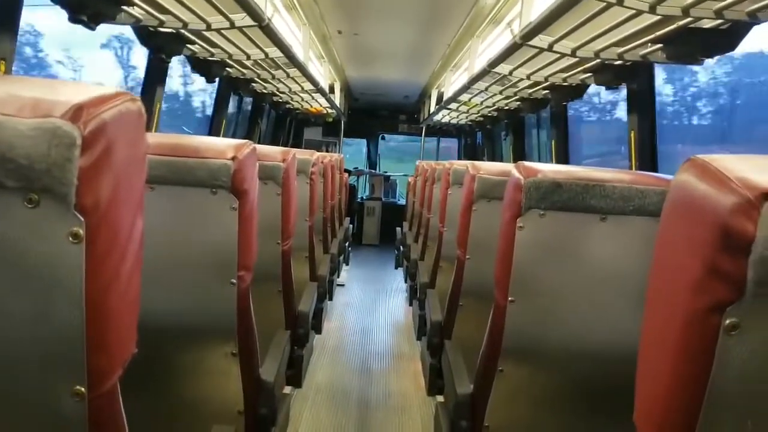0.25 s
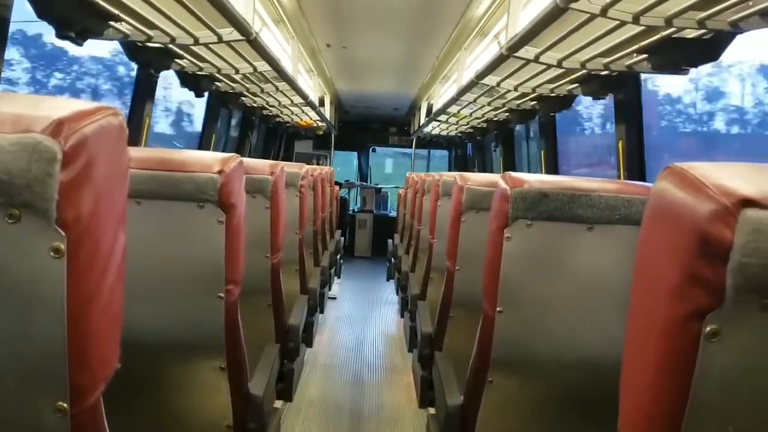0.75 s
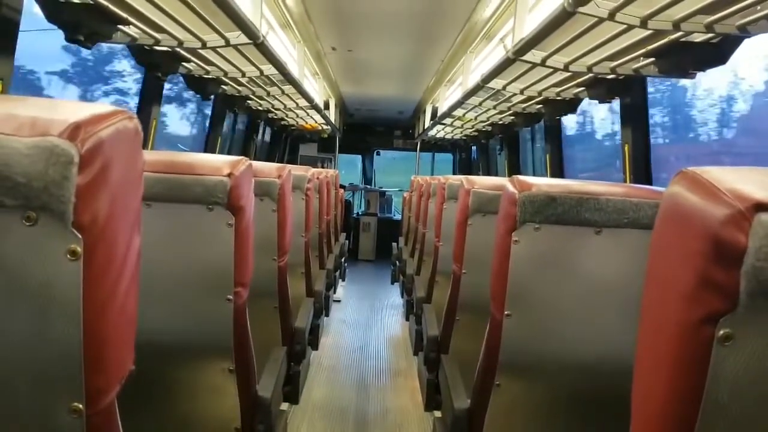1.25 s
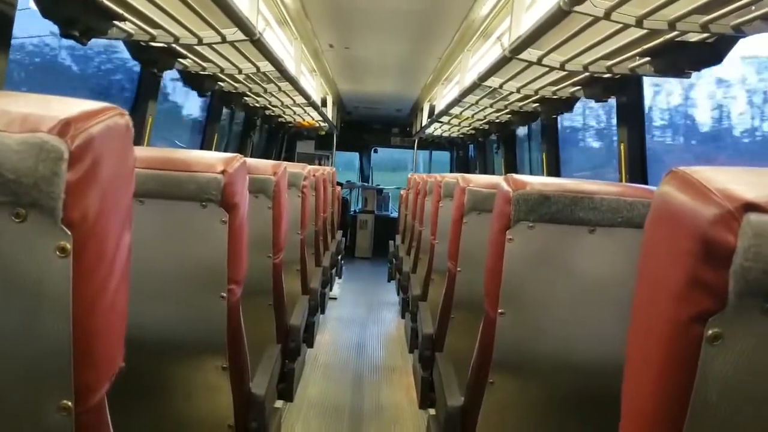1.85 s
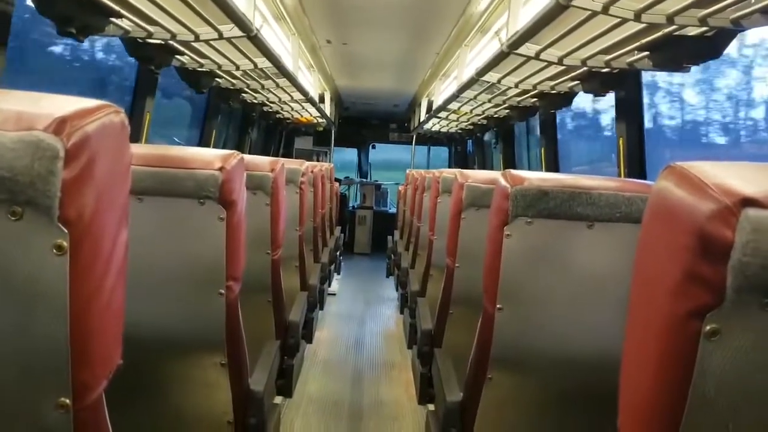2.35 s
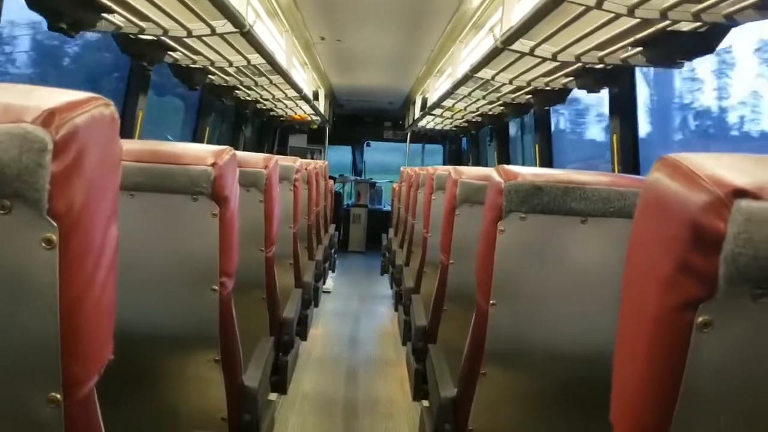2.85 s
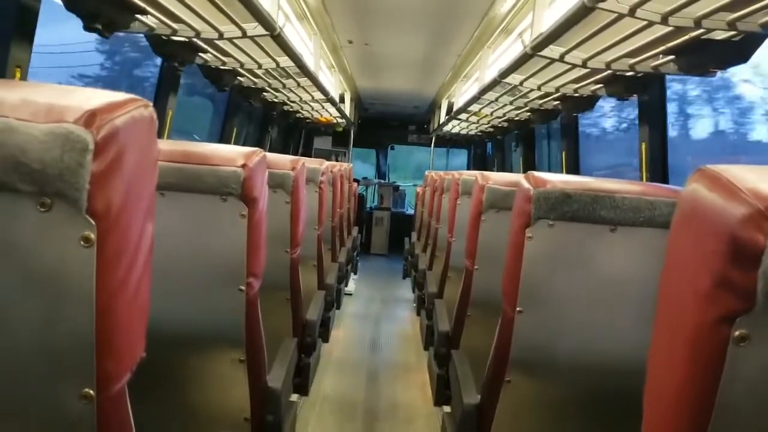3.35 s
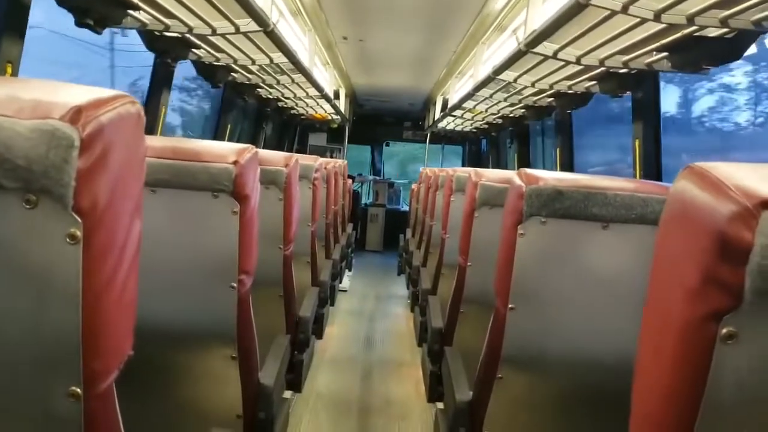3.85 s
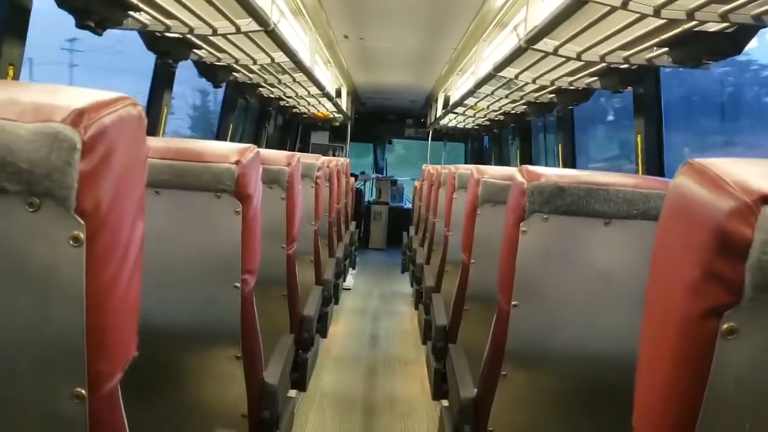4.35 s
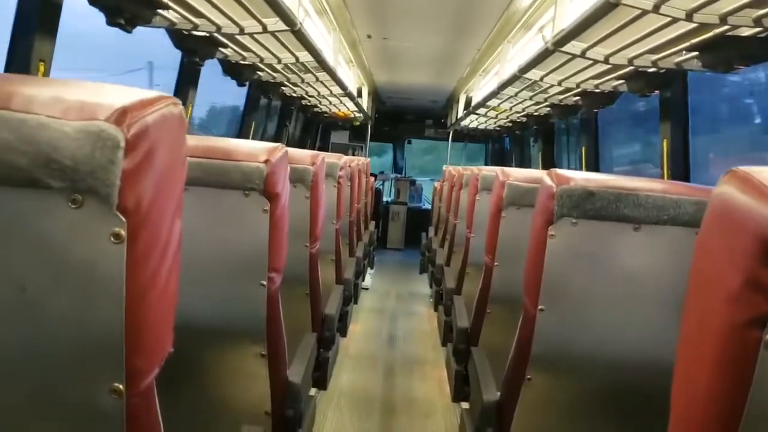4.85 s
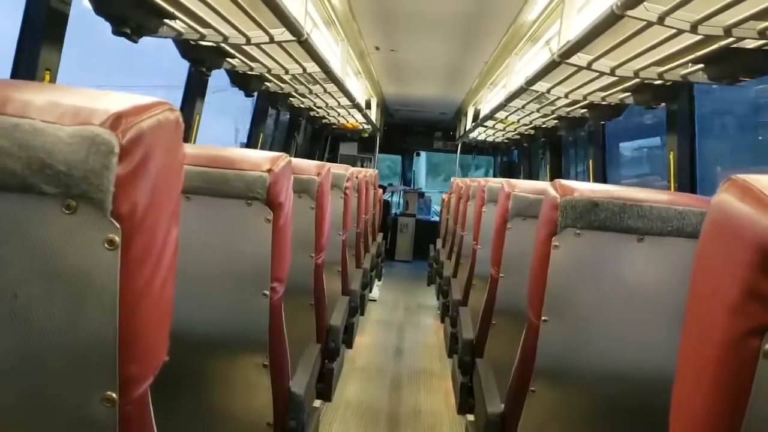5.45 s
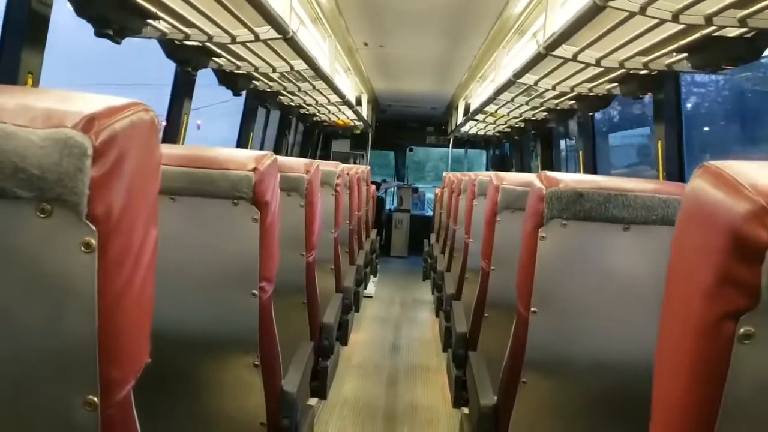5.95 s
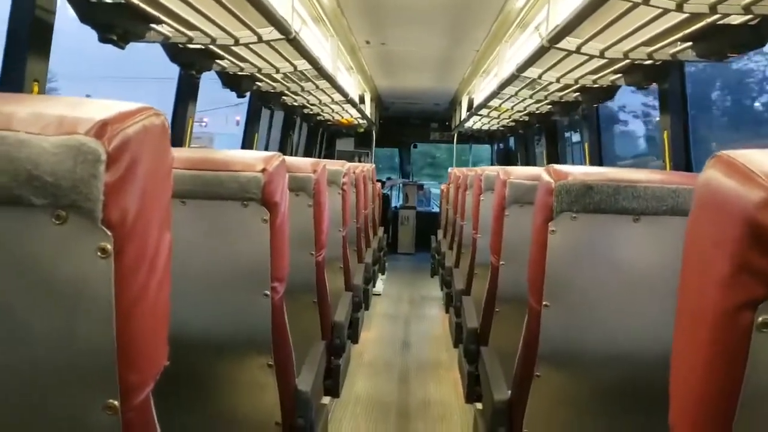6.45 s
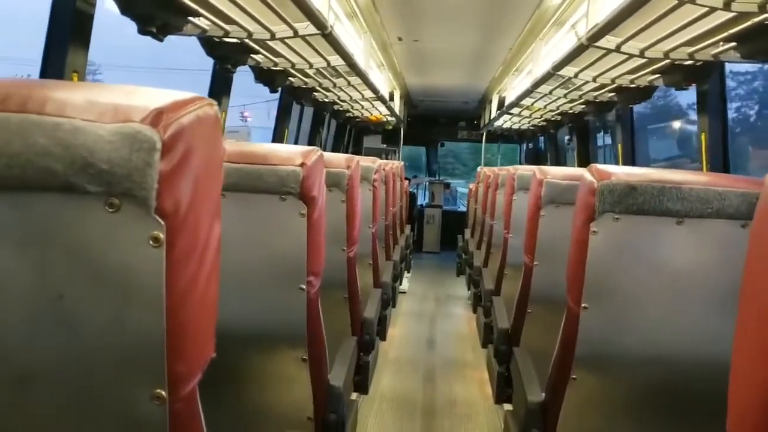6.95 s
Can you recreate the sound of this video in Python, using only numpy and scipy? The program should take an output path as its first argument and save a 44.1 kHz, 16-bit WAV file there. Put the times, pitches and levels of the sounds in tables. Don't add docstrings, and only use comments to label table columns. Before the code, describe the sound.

Inside an empty bus, near the rear diesel engine, a low throbbing idle-like growl begins and from about 0.3 s pulls harder, climbing steadily until 4.3 s. The low boom swells and changes as it crosses cabin resonances. Tiny high squeaks occur around 0.3-0.4 s, and loose trim ticks between 0.5 and 1 s. A very slight skip breaks the drone at 2.6 s. A faint high turbine whistle rises from about 2.7 s, and a fan hum joins after 3.1 s. Near 3.8 s the pull eases and a low shaft hum shows; jolts rattle around 3.6-4.1 s. From 4.4 to 4.8 s the gear shifts and pitch drops, then a steady, fuller drone holds until 6.4 s. The engine then falls rapidly in pitch, with a rattle at 6.7 s and faint late squeaks, over continuous tyre rumble and rough, broad engine roar in close stereo.

```python
import sys
import numpy as np
from scipy import signal
from scipy.fft import rfft, irfft, next_fast_len
from scipy.io import wavfile
from scipy.ndimage import uniform_filter1d, map_coordinates

SR = 44100
rng = np.random.default_rng(int(sys.argv[2]) if len(sys.argv) > 2 else 0)


def wrap_up_sound(samples):
    columns = np.atleast_2d(samples).T
    tamed = np.clip(columns, -1, 1)
    steps = np.round(tamed * 32767).astype(np.int16)
    wavfile.write(sys.argv[1], SR, steps)


def magnitude_from_level(level_db):
    exponent = np.asarray(level_db, float) / 20
    return 10 ** exponent


N = 317079

# time_s, crank_hz
CRANK = [(0, 20), (.3, 20.05), (.6, 22), (1, 23.9), (1.6, 26), (2.2, 27.69), (2.8, 30.08), (3.2, 31.56),
         (3.6, 32.84), (4.25, 34.45), (4.45, 34), (4.75, 31.3), (5.0, 30.7), (5.5, 30.1), (6.42, 30.95),
         (6.6, 27.02), (6.85, 23.3), (7.19, 21.06)]
# time_s, load_db
LOAD = [(0, 1.5), (.3, 2.5), (.55, 4), (1.2, 3.5), (2, 4), (2.8, 3.5), (3.2, 0.8), (3.7, -5.5),
        (4.05, -10.5), (4.3, -4.5), (4.52, -2), (4.85, -2), (5.4, 2.5), (6, 2.5), (6.4, -0.6), (6.62, -3.5),
        (6.8, 0), (7.19, -6.5)]
PEDAL_DOWN_S, PEDAL_UP_S, PEDAL_MOVE_S = .28, 6.44, .2

MAJOR_ORDERS = (2, 3, 4, 5, 6, 9, 10)
MAJOR_DB = (-25.5, -40, -26, -29, -29, -38.5, -34.5)
MAJOR_COAST_DB = (3.6, -8, 2.5, -13.5, 1.5, -9.5, -6.5)
# multiple, level_db
MINOR_ORDERS = [(1.5, -39.5), (2.5, -41.5), (3.5, -37), (4.5, -36.5), (5.5, -45), (6.5, -38.5), (7, -39),
                (7.5, -41.5), (8, -37), (11, -40), (12, -42), (13, -44.5), (14, -43.5)]
MINOR_DB, MINOR_LOAD, MINOR_COAST_DB = -1.5, 0.1, -4.5
# centre_hz, width_hz, level_db
PIPE = [(45, 6.8, -2), (58.08, 8.5, 7.5), (73.1, 5.7, 4.5), (86, 11.1, 6.5), (96.9, 14.7, 4),
        (127.65, 11.1, 1.5), (137.6, 11, -3.5), (168, 21, -9.5), (186.5, 27, -6.5), (214.4, 20, 3.6),
        (262, 17, -4.5), (327, 130, -7)]
# pitch_hz, gain_db
CABIN = [(30, -19), (45, -14), (60, 7.5), (75, 7.5), (105, -2), (127, -11.5), (152, 7.5), (175, -6.5),
         (198, 5), (217, -2.5), (245, -1), (268, 0.5), (300, 1.5), (370, -10)]
BEND_RAD, BEND_PER_HZ, BEND_AT_HZ = .21, -.065, 21

# time_s, shake_db
SHAKE = [(0, -1), (.35, -4.5), (1.1, -4), (2.2, -0.5), (3.05, -2), (3.6, -4.5), (3.95, 6), (4.15, 5),
         (4.5, 5.5), (4.85, 2.5), (6.2, 4), (6.61, 8), (6.8, 5), (7.19, -8)]
# pitch_hz, density_db (per Hz)
RUMBLE = [(12, -36), (25, -11), (40, -2.5), (60, 1.5), (80, 3), (105, -17), (150, 0), (200, -5.5),
          (300, -10), (450, -13.5), (700, -28), (950, -65.5)]
RUMBLE_DB, RUMBLE_SHAKE, RUMBLE_COAST_DB, RATTLE_DB = -29, 0.43, -3.5, -70.5
# pitch_hz, density_db (per Hz)
ROAR = [(240, -44.5), (400, -8.5), (433, -9.5), (599, -10.5), (885, -9.5), (1180, -14.5), (1230, -15),
        (1330, -15), (1590, -15), (4230, -27), (5780, -32.5), (9000, -48.5), (11700, -83.5), (19800, -120)]
ROAR_DB, ROAR_SPEED, ROAR_LOAD, ROAR_COAST_DB = -40.5, 1.3, 0.059, 0.44
# centre_hz, width_hz, gain_db
PANELS = [(910, 8.9, 6.5), (1238, 4.3, 12), (1602, 7.5, 8.5), (2310, 11, 6.5)]
# middle_s, length_s, change_db
GEAR = [
    (4.3, 0.28, -1),
    (5.557, 1.64, 1.5),
]
DULL_SHARE, DULL_HZ = 0.15, 2500

# pitch_hz, density_db (per Hz)
TRIM = [(7000, -31.5), (8500, -18.5), (9700, -7.5), (10800, -4.5), (12000, -1), (13200, -5.5), (14000, -13)]
# pitch_hz, density_db (per Hz)
KNOCK_COLOUR = [(1500, -59.5), (2500, -3.5), (8000, -9.0), (9500, -35.0)]
# start_s, peak_db
KNOCKS = [(0.5201, -49.5), (0.6139, -45.5), (0.719, -43), (0.8933, -46), (0.991, -55), (1.3238, -61),
          (1.5494, -56), (1.8621, -58), (2.0594, -66), (2.3659, -50), (3.028, -59), (3.6201, -47),
          (3.7198, -48), (3.858, -49), (4.0247, -47), (4.083, -42), (4.3778, -62), (4.5515, -56),
          (4.976, -64), (5.392, -65), (5.5706, -48), (6.4297, -61), (6.5255, -58), (6.669, -41)]
# start_s, length_s, pitch_hz, level_db
SQUEAKS = [
    (0.283, 0.042, 5720, -52.5),
    (0.327, 0.046, 5720, -69),
    (0.386, 0.025, 5660, -49),
    (.41, 0.056, 5660, -68),
    (6.86, .06, 5600, -65),
    (6.959, 0.077, 5700, -67),
]

# time_s, pitch_hz, level_db
TURBO = [(2.58, 6060, -81), (2.7, 6290, -59), (2.88, 6650, -69.5), (3.1, 6910, -55), (3.5, 7470, -60.5),
         (4.35, 8000, -62.5), (4.8, 8060, -61), (6.42, 7950, -61), (6.55, 7450, -66), (6.9, 5850, -72.5),
         (7.19, 5030, -85)]
# time_s, pitch_hz, level_db
DRIVELINE = [
    (2.9, 74.6, -52),
    (3.2, 76.26, -38.5),
    (3.8, 83.1, -26.5),
    (4.1, 79.65, -41.5),
    (4.6, 83.1, -39.5),
    (4.9, 77.2, -52),
    (6.5, 70, -59.5),
    (6.8, 60.3, -31),
    (7.19, 55.8, -35.5),
]
FAN_RATIO, FAN_ON_S, FAN_DB = 4.7, 3.1, -36

# pitch_hz, likeness (0-1)
ALIKE = [(60, 0.94), (250, 0.98), (500, 0.58), (1000, 0.28), (2000, 0.31), (4000, 0.3), (8000, 0.1),
         (13000, 0)]
# pitch_hz, lead_rad
LEAD = [(30, .06), (60, 0.063), (250, 0.35), (520, 0.1), (1120, 2.83), (1800, 2.8), (3450, 6), (5700, 3.66),
        (8000, 6.3)]
# pitch_hz, difference_db
LEAN = [(60, -0.5), (110, 0.5), (200, -1), (380, -1.5), (700, -1), (1290, -1), (2380, 1.5), (4400, -0.5),
        (8120, -6.5), (15000, -2.5)]
LOST_AT, LOST_TURNS = 2.60497, 1 / 4
# pitch_hz, depth_db
HEARD = [(1000, 11), (3000, 11.5), (4500, 12), (6000, 16), (7200, 16), (8300, 10.5), (9300, 4.5),
         (10500, 7), (13000, 10)]
FIRST_TOP_HZ, LAST_TOP_HZ = 13120, 16820


def unit(x):
    return x / np.sqrt(np.mean(x ** 2) + 1e-20)


def along(points, hz):
    f, v = np.transpose(points)
    return np.interp(np.log(hz + 1), np.log(f + 1), v)


def curves(rows):
    s, *cols = np.transpose(rows)
    return [np.interp(np.arange(N) / SR, s, c) for c in cols]


def wobble(rate):
    knots = rng.standard_normal(int(N * 400 / SR) + 4)
    return map_coordinates(knots, [np.arange(N) * rate / SR])


def filtered(x, response, edge="odd"):
    m = next_fast_len(N + SR // 4)
    rim = [(0, 0)] * (x.ndim - 1) + [(2048, 2048)]
    spectrum = rfft(np.pad(x, rim, "reflect", reflect_type=edge), m)
    return irfft(spectrum * response(np.fft.rfftfreq(m, 1 / SR)), m)[..., 2048:2048 + N]


def rush(gain, patchy_db):
    z = signal.stft(rng.standard_normal((2, N + 512)), nperseg=512)[2]
    field = uniform_filter1d(rng.standard_normal(z.shape[1:]), size=5, axis=0)
    field = uniform_filter1d(field, size=10, axis=1)
    noise = signal.istft(z * magnitude_from_level(patchy_db * unit(field)), nperseg=512)[1][:, :N]
    return unit(filtered(noise, gain, edge="even"))


def coasting():
    t = np.arange(N) / SR
    until_down = PEDAL_DOWN_S + PEDAL_MOVE_S - t
    since_up = t - PEDAL_UP_S
    return np.clip(np.maximum(until_down, since_up) / PEDAL_MOVE_S, 0, 1)


def crank_angle():
    hz = curves(CRANK)[0] + .05 * wobble(6)
    angle = 2 * np.pi * np.cumsum(hz) / SR
    return angle - angle[int(LOST_AT * SR)] - np.pi / 2


def boom(angle):
    (hz,), (load_db,), coast = curves(CRANK), curves(LOAD), coasting()
    grid_hz = np.arange(20, 400, .25)
    power = 0
    for centre, width, db in PIPE:
        power = power + magnitude_from_level(db) ** 2 / (1 + (2 * (grid_hz - centre) / width) ** 2) ** 2
    pipe_gain = np.sqrt(power)
    bend = BEND_RAD + BEND_PER_HZ * (hz - BEND_AT_HZ)
    out = 0
    for k, db, coast_db in zip(MAJOR_ORDERS, MAJOR_DB, MAJOR_COAST_DB):
        phase = k * angle - .36 + bend * (min(k, 6) ** 2 - 4)
        pulse = magnitude_from_level(.7 * wobble(9)) * np.cos(phase)
        out += magnitude_from_level(db + load_db + coast_db * coast) * np.interp(k * hz, grid_hz, pipe_gain) * pulse
    weak_db = MINOR_DB + MINOR_LOAD * load_db + MINOR_COAST_DB * coast
    for k, db in MINOR_ORDERS:
        drift = rng.uniform(0, 2 * np.pi) + .4 * wobble(1.2)
        sway_db = 1.4 * wobble(3)
        out += magnitude_from_level(db + weak_db + along(CABIN, k * hz) + sway_db) * np.cos(k * angle + drift)
    return np.sqrt(2) * out


def roar(angle):
    (hz,), (load_db,), (shake_db,), coast = curves(CRANK), curves(LOAD), curves(SHAKE), coasting()
    t = np.arange(N) / SR
    gear_db = sum(db * np.clip(1 - abs(2 * (t - s) / length), 0, 1) for s, length, db in GEAR)
    speed_db = 20 * np.log10(hz / 30)
    roar_db = ROAR_DB + ROAR_SPEED * speed_db + ROAR_LOAD * load_db + ROAR_COAST_DB * coast + gear_db

    rumble_db = RUMBLE_DB + RUMBLE_SHAKE * shake_db + RUMBLE_COAST_DB * coast + 0.37 * wobble(12)
    rumble = magnitude_from_level(rumble_db) * rush(lambda f: magnitude_from_level(along(RUMBLE, f)), patchy_db=-1.0)

    def ring(f):
        return 1 + sum((magnitude_from_level(db) - 1) / (1 + (2 * (f - c) / w) ** 2) for c, w, db in PANELS)

    firing = 1 + 0.049 * np.cos(2 * angle)
    noise = rush(lambda f: magnitude_from_level(along(ROAR, f)) * ring(f), patchy_db=1.25)
    hiss = filtered(noise, lambda f: 1 / (1 + (DULL_HZ / (f + 1)) ** 4))
    noise = noise - DULL_SHARE * coast * hiss
    return rumble + magnitude_from_level(roar_db + 0.98 * wobble(4.2)) * firing * noise


def trim():
    t = np.arange(N) / SR
    level = magnitude_from_level(RATTLE_DB + curves(SHAKE)[0] + 2.4 * wobble(14) + 2.2 * wobble(56))
    jolts = np.zeros(N)
    jolts[[int(s * SR) for s, _ in KNOCKS]] = [magnitude_from_level(db - 13.5) for _, db in KNOCKS]
    decay_t = t[:SR // 5]
    decay = magnitude_from_level(-60 * decay_t / 0.15) * (1 - np.exp(-decay_t / 0.0024))
    jolts = signal.fftconvolve(jolts, decay)[:N]
    fizz = (level + jolts) * rush(lambda hz: magnitude_from_level(along(TRIM, hz)), patchy_db=0)
    fizz += magnitude_from_level(6.5) * jolts * rush(lambda hz: magnitude_from_level(along(KNOCK_COLOUR, hz)), patchy_db=-3.5)
    squeak = 0
    for s, length, hz, db in SQUEAKS:
        swell = np.clip(5.1 * (1 - abs(2 * (t - s) / length - 1)), 0, 1)
        squeak = squeak + magnitude_from_level(db) * swell * np.sin(2 * np.pi * hz * t)
    return fizz + squeak * magnitude_from_level(1.5 * wobble(53))


def turbo(angle):
    hz, db = curves(TURBO)
    swing_hz = 190 * (hz / 8000) ** 3 * np.cos(2 * angle)
    jitter_hz = (26 + 60 * coasting()) * wobble(22)
    spin = 2 * np.pi * np.cumsum(hz + jitter_hz + swing_hz) / SR
    tone = np.sin(spin) + magnitude_from_level(-16.5) * np.sin(2 / 3 * spin)
    tone = magnitude_from_level(db + 0.99 * wobble(9)) * tone
    echoes = rng.standard_normal((2, SR // 10)) * magnitude_from_level(-60 * np.arange(SR // 10) / SR / .15)
    echoes = echoes / np.linalg.norm(echoes[0])
    return tone + magnitude_from_level(6) * signal.fftconvolve(tone[None], echoes, axes=1)[:, :N]


def driveline():
    hz, db = curves(DRIVELINE)
    phase = 2 * np.pi * np.cumsum(hz + 0.58 * wobble(3.2)) / SR
    return np.sqrt(2) * magnitude_from_level(db + 1.5 * wobble(37)) * np.sin(phase)


def fan(angle):
    grip = np.clip((np.arange(N) / SR - FAN_ON_S) / 0.19, 0, 1) * (1 - coasting())
    tone = np.cos(FAN_RATIO * angle + 0.47 * wobble(1.9))
    return np.sqrt(2) * grip * magnitude_from_level(FAN_DB + 2.8 * wobble(3.63)) * tone


def ports(direct, diffuse):
    sign = np.array([[.5], [-.5]])

    def turn(hz):
        return np.arccos(np.clip(along(ALIKE, hz), 0, 1)) / 2

    def place(hz):
        return magnitude_from_level(sign * along(LEAN, hz)) * np.exp(1j * sign * along(LEAD, hz))

    shared = filtered(direct, lambda hz: np.cos(turn(hz)) * place(hz))
    return shared + filtered(diffuse, lambda hz: 2 * sign * np.sin(turn(hz)) * place(hz))


def scene():
    angle = crank_angle()
    low = boom(angle) + driveline() + fan(angle)
    direct, diffuse = roar(angle) + trim() + turbo(angle)
    return ports(direct + low, diffuse + 0.33 * np.roll(low, 300))


def masked(x):
    hz, _, z = signal.stft(x, SR, nperseg=2048, noverlap=1024)
    centre_hz = hz[2:1024:4, None]
    power = np.sum(abs(z[:, :1024]) ** 2, axis=0)
    db = 10 * np.log10(uniform_filter1d(power, size=8, axis=0)[2::4] + 1e-16)
    masker = np.where(centre_hz > 3000, db, -200)
    spread = [np.roll(masker, k, axis=0) - .3 * k for k in range(24)]
    loudest = np.max([db] + spread, axis=0)
    narrow = unit(uniform_filter1d(rng.standard_normal(db.shape), size=4, axis=1))
    broad = unit(uniform_filter1d(rng.standard_normal(db.shape), size=14, axis=0))
    margin = db - loudest + along(HEARD, centre_hz) + 4.5 * narrow + 4.5 * broad
    kept = np.clip(margin / 1.5, 0, 1) ** (centre_hz > 900)
    z[:, :1024] *= np.repeat(kept, 4, axis=0)
    relative = abs(z) ** 2 / uniform_filter1d(abs(z) ** 2 + 1e-20, size=16, axis=1)
    z *= np.clip(relative / .45, 0, 1) ** (hz > 900)[:, None]
    z = z * (hz < FIRST_TOP_HZ)[:, None]
    return signal.istft(z, SR, nperseg=2048, noverlap=1024)[1][:, :N]


def band_limit(x):
    return signal.sosfilt(signal.butter(12, 16820, fs=SR, output="sos"), x)


def record(dry):
    cut = int(LOST_AT * SR)
    lost = int(LOST_TURNS * SR / curves(CRANK)[0][cut])
    kept = np.delete(masked(dry), slice(cut, cut + lost), axis=1)
    kept = np.pad(kept, [(0, 0), (0, lost)], "reflect", reflect_type="odd")
    edge = signal.butter(12, LAST_TOP_HZ, fs=SR, output="sos")
    mix = signal.sosfiltfilt(edge, kept)
    return band_limit(mix)


dry = scene()
out = record(dry)
wrap_up_sound(out)
```